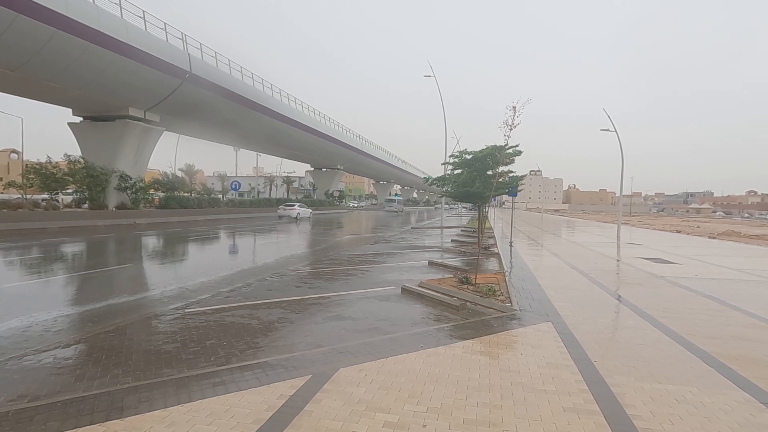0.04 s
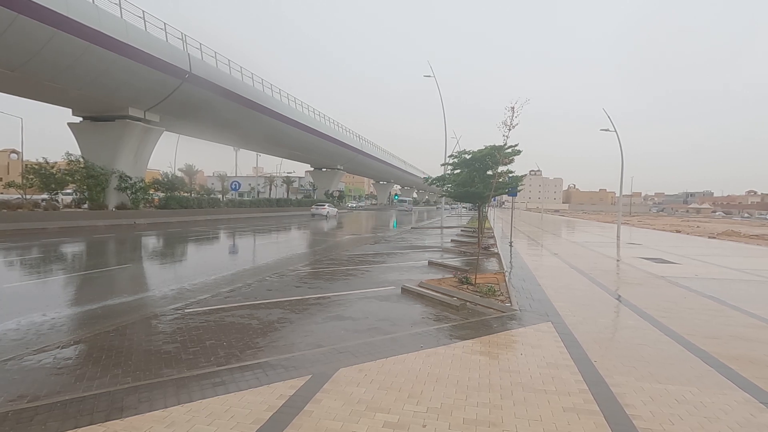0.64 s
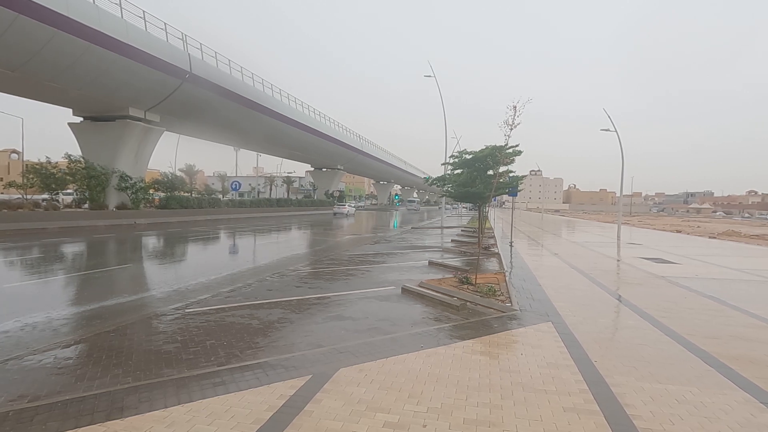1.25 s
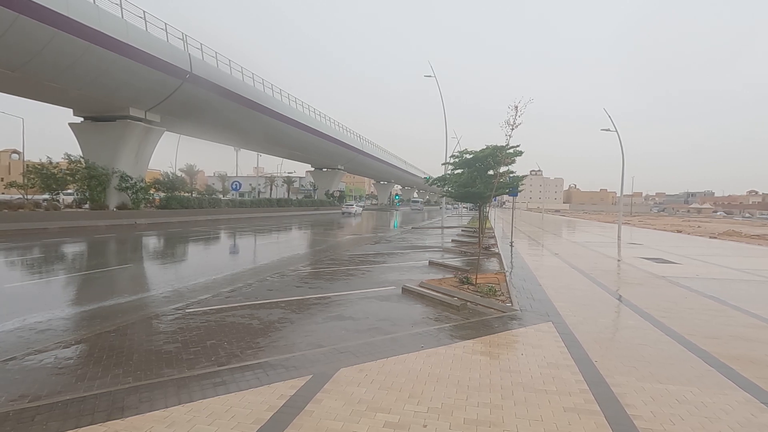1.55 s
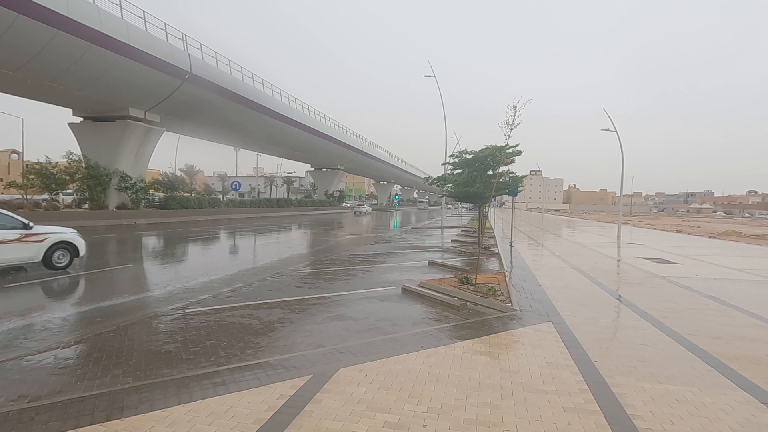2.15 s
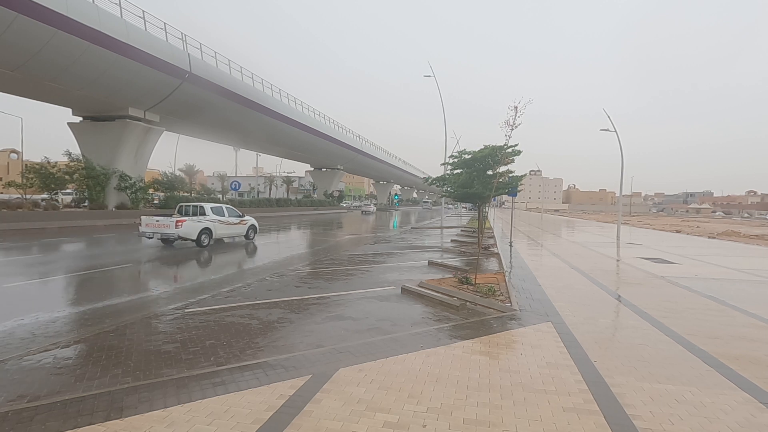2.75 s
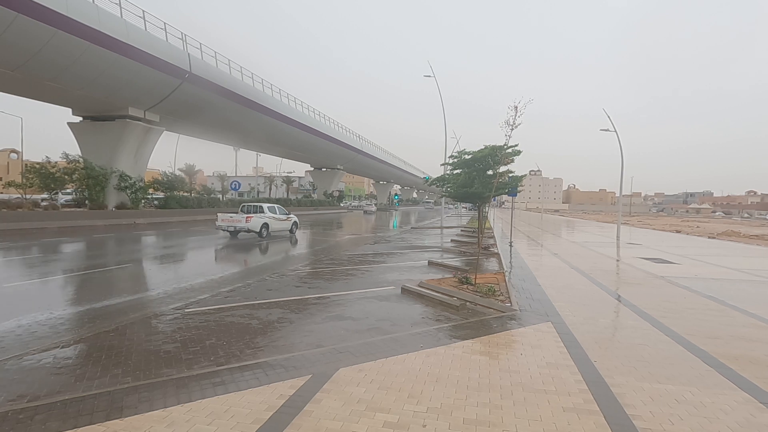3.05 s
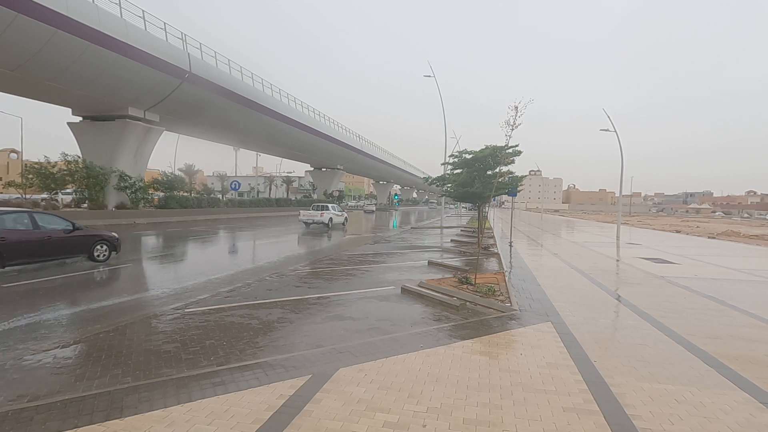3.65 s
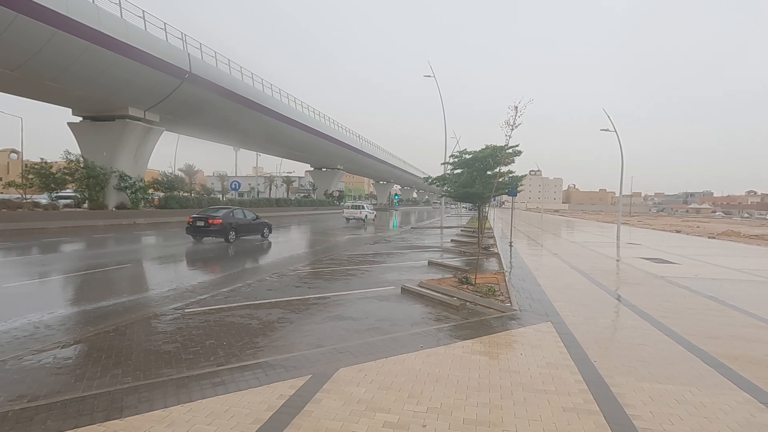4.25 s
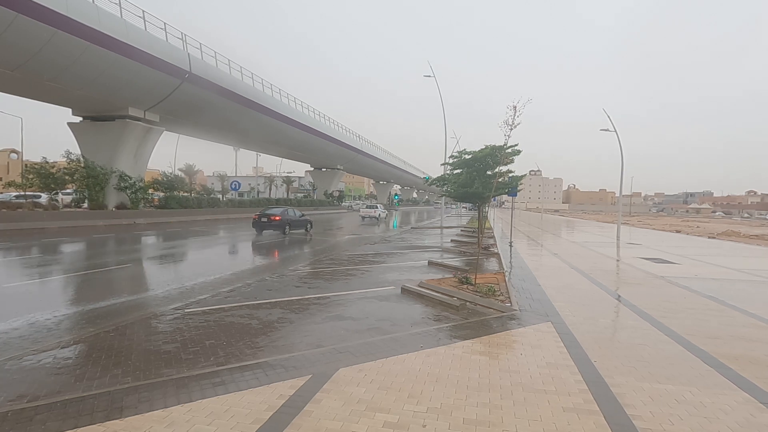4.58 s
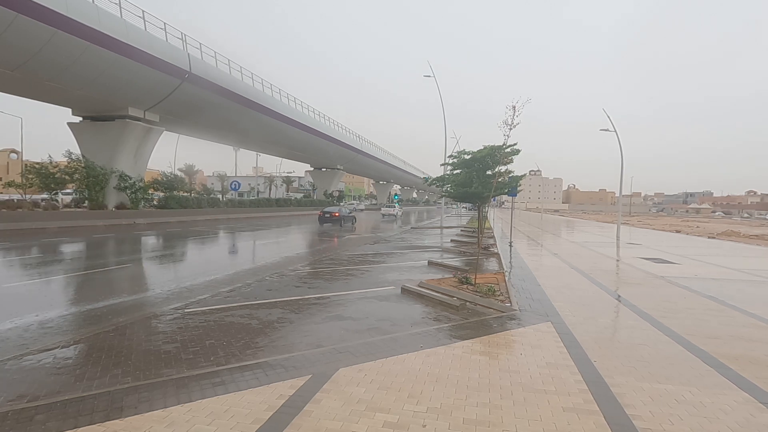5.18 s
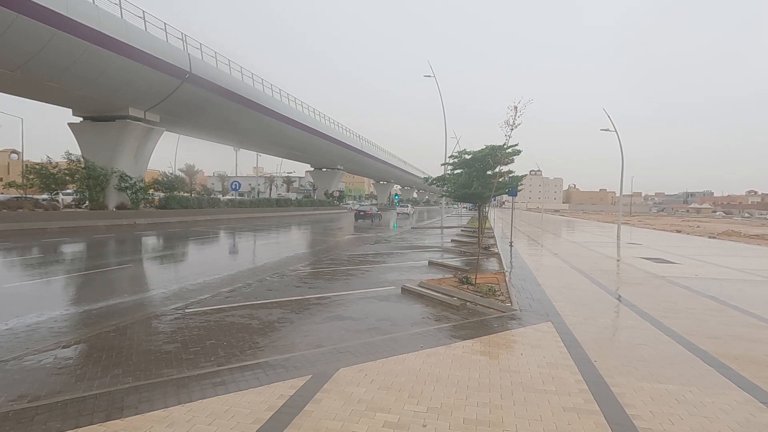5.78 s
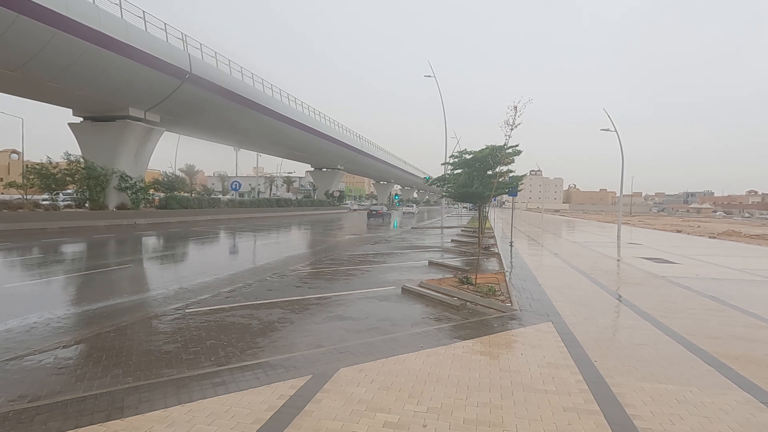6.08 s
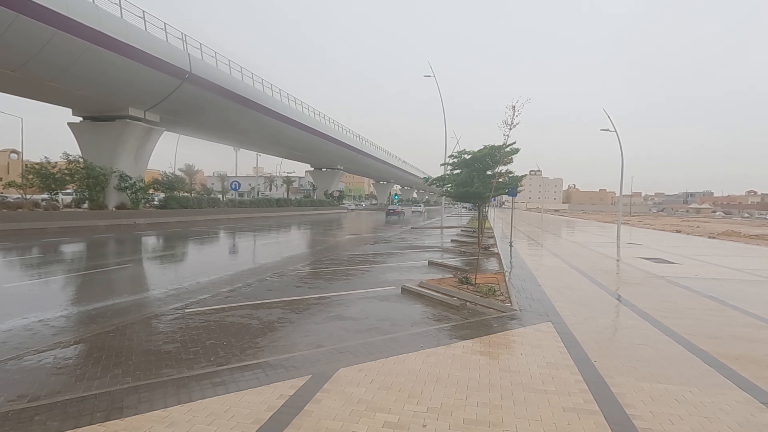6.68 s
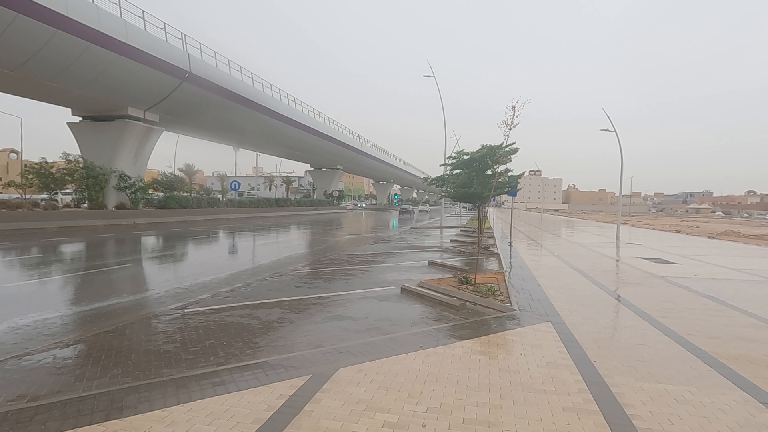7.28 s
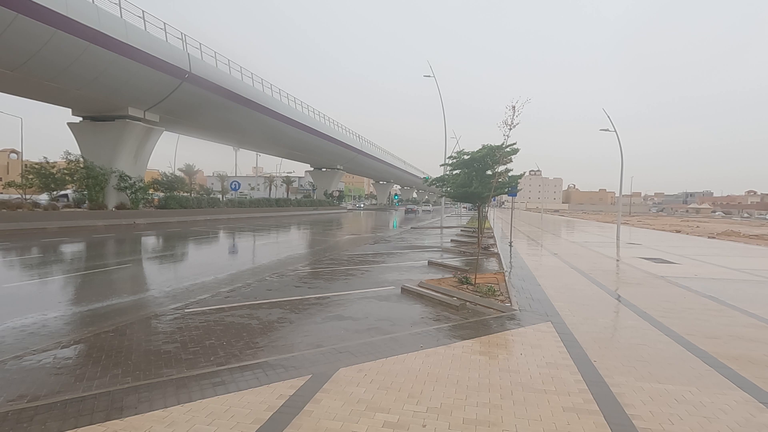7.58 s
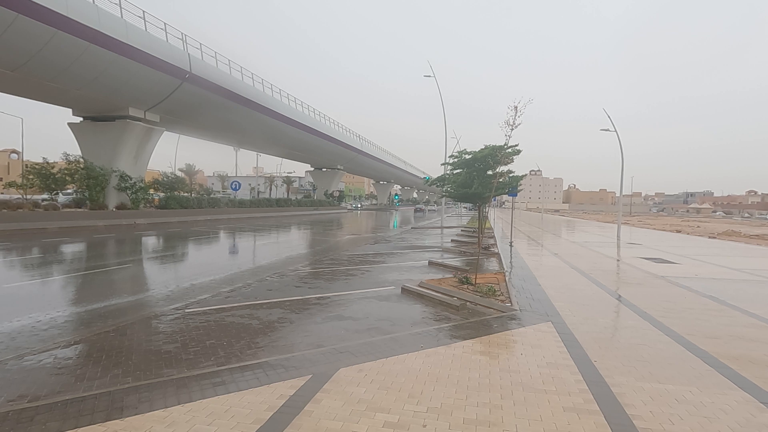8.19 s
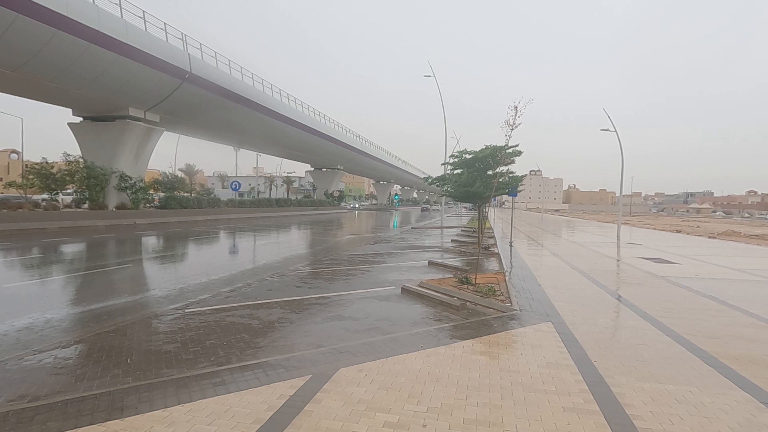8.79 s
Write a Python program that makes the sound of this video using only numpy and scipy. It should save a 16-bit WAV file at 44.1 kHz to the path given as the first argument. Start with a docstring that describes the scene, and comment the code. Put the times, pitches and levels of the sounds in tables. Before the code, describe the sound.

Steady rain patters on a wide wet road and paving, with low traffic rumble and light gusts of wind, all heard through a muffled microphone. Tyre hiss from a passing vehicle is already there at the start. A pickup passes from about 1.5 to 3 seconds with a low exhaust hum, its tyres roaring, hissing and swishing through water. A car follows at about 3.5 to 4.5 seconds, throwing spray, and a softer pass comes near 6 seconds. At 5.5 seconds a raindrop strikes by the microphone with a short ringing tick. From about 6 seconds a heavier engine drones, strongest near 7, then climbs in pitch to the end as the hiss eases. Another vehicle and the rumble swell around 8.5 seconds. Dull thumps fall at the very start and near 2.5, 4.1, 5.1, 7.2 and 8.7 seconds.

```python
"""Tyres roar and hiss on a wide wet road in steady rain, heard through a muffled microphone.
A pickup and a saloon pass among other traffic, swelling by the inverse square law and throwing spray;
then a heavier engine pulls up through its revs, its exhaust harmonics rising with the firing rate.
Raindrops patter and set bubbles ringing, and one strikes by the microphone and rings its casing.
Dull thumps, traffic rumble and light wind fill the bass."""
import sys
import numpy as np
from scipy import signal
from scipy.fft import rfft, irfft, next_fast_len
from scipy.io import wavfile

SR = 44100
rng = np.random.default_rng(int(sys.argv[2]) if len(sys.argv) > 2 else 0)


def transcribe(u):
    """Save the signal u as a 16-bit wav file named by the first command-line argument.

    u: samples, shape (n,) or (channels, n), limited to [-1, 1]; the rate is SR.
    q: integer samples, one column per channel.
    """
    v = np.clip(np.atleast_2d(u).T, -1, 1)
    q = np.round(v * 32767).astype(np.int16)
    wavfile.write(sys.argv[1], SR, q)


N = 393813
TIME = np.arange(N) / SR


# spectra of tread hiss, hollow body noise and spray: frequency_hz, density_db
TREAD_SPECTRUM = [(500, -20), (900, -5), (1150, -2.5), (1400, 1), (1620, -1), (1830, -5), (2020, -7.5),
                  (2250, -11.5), (2430, -26), (2900, -19), (3500, -28.5), (4300, -46.5), (6000, -65.5)]
BODY_SPECTRUM = [(100, -12.5), (200, 3.5), (290, 1), (400, -2.5), (530, -3.5), (750, -3.5), (1300, -38)]
SPRAY_SPECTRUM = [(1500, -5), (2400, 5), (3000, 4.5), (3700, 0.5), (4400, -6), (5000, -10.5), (5600, -13),
                  (6300, -22), (7300, -29), (7900, -45.5), (9000, -61.5)]
# spray thrown up behind the wheels: peak_s, half_width_s, level_db
SPRAY_PLUMES = [(0.2, 0.35, -47.5), (0.87, 0.33, -45), (2.1, 0.37, -50.5), (2.9, 0.25, -54.5),
                (4.3, 0.54, -47.5), (5.85, 0.35, -53.5), (8.6, 0.6, -64.5)]
# passing vehicles, whose hiss and roar peak a lag after the closest approach:
# nearest_s, half_width_s, tread_lag_s, tread_db, body_db, roar_lag_s, roar_db, roar_pitch_ratio
PASS_BYS = [(-0.14, 0.83, 0.32, -30, -40.5, 0.3, -39, 0.95),
            (1.88, 0.65, 0.88, -28, -29.5, 0.13, -26, 1.007),
            (3.52, 0.65, 0.7, -28.5, -33, 0.46, -27, 1.13), (5.42, 0.4, 0.84, -33.5, -43, 0.55, -43, 1.6),
            (6.6, 0.34, 0.41, -41.5, -36, 0.03, -32.5, 0.95), (7.5, 0.18, 0.5, -50, -42, 0.03, -31.5, 1.4),
            (8.58, 0.38, 0.67, -37.5, -31.5, 0.03, -32, 0.99)]

def tyres():
    """Incoherent sources add in power: hissing grooves, hollow body noise and falling spray."""
    tread_power, body_power, spray_power = from_db([-33, -46, -62]) ** 2  # steady wash of far tyres
    for nearest_s, half_width_s, tread_lag_s, tread_db, body_db, *_ in PASS_BYS:
        tread_power += swell(nearest_s + tread_lag_s, half_width_s, tread_db)  # thrown backward
        body_power += swell(nearest_s, half_width_s, body_db)
    spray_power += sum(swell(*plume) for plume in SPRAY_PLUMES)
    tread = np.sqrt(tread_power) * turbulence(TREAD_SPECTRUM, flutter_db=0.5, flutter_hz=19)
    body = np.sqrt(body_power) * turbulence(BODY_SPECTRUM, flutter_db=0.6, flutter_hz=25)
    spray = np.sqrt(spray_power) * coloured(droplets(per_s=14000, spread_db=2.5), SPRAY_SPECTRUM)
    return tread + body + spray


# spectrum of the contact patch's roar: frequency_hz, density_db
ROAR_SPECTRUM = [(300, -18.5), (520, -3.5), (720, -0.5), (900, 1), (1100, -3), (1500, -12), (2400, -37.5)]

def rolling_roar(flutter_db):
    """Each contact patch radiates broadband noise, deepest alongside and higher with distance."""
    near_ratio, far_ratio, halfway_s = 0.92, 1.54, 1.63
    edges_hz = np.geomspace(250, 2800, num=15)
    centres_hz = np.sqrt(edges_hz[1:] * edges_hz[:-1])[:, None]
    hop = 200
    frame_s = TIME[::hop]
    hz, db = np.transpose(ROAR_SPECTRUM)

    def shares(ratio):
        """Fraction of the power in each band, with the spectrum shifted by ratio."""
        density = from_db(np.interp(np.log(centres_hz / ratio), np.log(hz), db)) ** 2
        band_power = density * np.diff(edges_hz)[:, None]
        return band_power / band_power.sum(axis=0)

    power = from_db(-43) ** 2 * shares(0.89)  # steady wash of far tyres
    for nearest_s, half_width_s, *_, lag_s, roar_db, pitch_ratio in PASS_BYS:
        away = 1 - 1 / (1 + ((frame_s - nearest_s - lag_s) / halfway_s) ** 2)
        ratio = pitch_ratio * (near_ratio + (far_ratio - near_ratio) * away)
        power = power + swell(nearest_s + lag_s, half_width_s, roar_db)[::hop] * shares(ratio)
    roar = sum(np.interp(TIME, frame_s, np.sqrt(band_power)) * band_noise(low_hz, high_hz)
               for low_hz, high_hz, band_power in zip(edges_hz, edges_hz[1:], power))
    return roar * from_db(flutter_db * drift(8))


# patches of road where the tread sings: peak_s, half_width_s, level_db, pitch_hz
SINGING_PATCHES = [(0.45, 0.09, -34, 803), (2.55, 0.13, -31.5, 1390), (3.97, 0.13, -32, 1382),
                   (4.6, 0.1, -35, 964), (5.65, 0.15, -36.5, 1420), (6.2, 0.25, -33.5, 1520)]

def groove_resonance(edge_ratio, waver_db):
    """Air resonating in the tyre grooves gives narrow, wavering bands of noise."""
    song = sum(np.sqrt(swell(peak_s, half_width_s, db)) * band_noise(hz / edge_ratio, hz * edge_ratio)
               for peak_s, half_width_s, db, hz in SINGING_PATCHES)
    return song * from_db(waver_db * drift(15))


# spectrum of a swish of water: frequency_hz, density_db
SWISH_SPECTRUM = [(1100, -3.5), (1450, 1), (2000, 7), (2450, -2), (3100, -16.5), (4000, -30)]
# sheets of water thrown aside: peak_s, half_width_s, level_db
WATER_SHEETS = [(0.15, 0.18, -38), (0.821, 0.15, -40), (1.42, 0.082, -40.5), (2.08, 0.19, -35.5),
                (3.051, 0.082, -37), (3.35, 0.13, -35.5), (3.7, 0.17, -38.5), (5.799, 0.19, -42)]

def puddle_swishes():
    """Thousands of droplet impacts superpose into a brief swish as water is thrown aside."""
    power = sum(swell(*sheet) for sheet in WATER_SHEETS)
    return np.sqrt(power) * coloured(droplets(per_s=4400, spread_db=3.5), SWISH_SPECTRUM)


# spectrum of rain on the paving: frequency_hz, density_db
RAIN_SPECTRUM = [(300, -7), (700, 0.5), (1400, 7.5), (2000, -3), (2450, -14.5), (3000, -14), (4000, -29.5),
                 (5500, -38.5), (7000, -54.5), (8000, -69), (12000, -67.5)]

def rain(ring_cycles):
    """Impacts patter on the paving; drops that hit puddles trap bubbles, which resonate briefly."""
    patter = coloured(droplets(per_s=2200, spread_db=0.5), RAIN_SPECTRUM)
    pitches_hz = np.geomspace(900, 3200, num=12)
    births = droplets(per_s=170, spread_db=3.0)
    pitch_index = rng.integers(0, len(pitches_hz), N)
    bubbles = sum(ring(births * (pitch_index == k), hz, ring_cycles / hz)
                  for k, hz in enumerate(pitches_hz))
    return from_db(-41.5) * patter + from_db(-40.5) * coloured(bubbles, RAIN_SPECTRUM)


# exhaust tones of two engines: time_s, firing_hz, fundamental_db, octave_db
PICKUP_EXHAUST = [(0, 57.06, -33.5, -39), (1.4, 57.94, -33.5, -45.5), (2.1, 58.1, -53, -42.5),
                  (2.6, 59.44, -29, -30.5), (3.1, 60.3, -35.5, -34.5), (3.5, 58.2, -42, -34.5),
                  (4.7, 56.23, -35.5, -42), (6.2, 55, -46.5, -64)]
HEAVY_EXHAUST = [(5.4, 60.1, -64.5, -67), (6.2, 60.5, -38.5, -40.5), (6.55, 61.36, -39, -29),
                 (6.85, 63.43, -19.5, -39), (7.2, 63.73, -30.5, -36.5), (7.9, 74.86, -35, -35.5),
                 (8.93, 79.9, -42, -32.5)]

def engine(exhaust, third_re_octave_db, uneven_db):
    """Periodic firing makes a harmonic series; only the lowest three orders stand out at the kerb."""
    firing_hz, fundamental_db, octave_db = in_time(exhaust)
    phase = firing_phase(firing_hz, wander=0.0085)
    levels_db = [fundamental_db, octave_db, octave_db + third_re_octave_db]
    return np.sqrt(2) * sum(from_db(db + uneven_db * drift(6.6)) * np.sin(order * phase)
                            for order, db in enumerate(levels_db, 1))


# a farther engine droning, then speeding up: time_s, firing_hz, level_db
FAR_EXHAUST = [(5.1, 88.8, -56), (5.7, 89.9, -34), (6.1, 91.1, -28.5), (6.7, 89.2, -54), (7, 66.9, -46),
               (7.3, 73.44, -33), (7.75, 87.1, -28), (8.3, 93.7, -33), (8.93, 102, -40)]

def far_engine():
    """A single exhaust tone, weakly modulated in amplitude and frequency."""
    firing_hz, db = in_time(FAR_EXHAUST)
    return from_db(db + 1.7 * drift(3.3)) * np.sin(firing_phase(firing_hz, wander=0.005))


# modes of the microphone's casing: pitch_hz, gain_db, t60_s
CASING_MODES = [(1840, -8, .06), (2320, -3, .08), (2400, -9.5, 0.086), (2600, -16, 0.061), (2830, -10, .02),
                (11300, -11, 0.005)]

def close_drop(start_s, impact_db, tick_gain_db, splash_gain_db, splash_s):
    """An impact excites the casing's damped modes, with a muffled tick and a brief splash around it."""
    impact = from_db(impact_db) * (np.arange(N) == round(start_s * SR))
    tick = from_db(tick_gain_db) * butterworth(impact, 2, [1300, 3200], "band")
    casing = sum(from_db(db) * ring(impact, hz, t60_s) for hz, db, t60_s in CASING_MODES)
    splash_envelope = from_db(impact_db + splash_gain_db) * np.exp(-np.abs(TIME - start_s) / splash_s)
    splash = splash_envelope * band_noise(2150, 2660)
    return butterworth(tick + casing + splash, 3, 4800, "low")


# dull thumps: start_s, level_db, pitch_hz, t60_cycles
LOW_KNOCKS = [(0.127, -15, 64, 5.4), (0.13, -16, 230, 3.7), (0.15, -14.5, 164, 5.9),
              (0.158, -15.5, 290, 4.6), (2.46, -11.5, 112, 5), (2.507, -12.5, 180, 7),
              (2.5119, -16.5, 280, 13), (2.525, -18, 340, 5), (4.066, -19, 70.4, 6), (4.083, -14, 150, 8),
              (4.143, -13, 63.6, 4.4), (4.1551, -15, 403, 8), (5.118, -15.5, 84.5, 12),
              (7.236, -13.5, 62.4, 7), (7.256, -12, 127, 7.3), (8.695, -14, 238, 6.9)]

def thumps(puff_gain_db, puff_rise_s):
    """Heavily damped oscillations die within a few cycles, each with a puff of noise near its pitch."""
    size = SR // 4
    age_s = np.arange(size) / SR
    puff_envelope = from_db(puff_gain_db) * age_s / puff_rise_s * np.exp(1 - age_s / puff_rise_s)
    track = np.zeros(N + size)
    for start_s, db, hz, t60_cycles in LOW_KNOCKS:
        knock = np.sin(2 * np.pi * hz * age_s) * np.exp(-np.log(1000) * age_s * hz / t60_cycles)
        puff = puff_envelope * band_noise(hz / 2, hz * 1.4, size)
        start = round(start_s * SR)
        track[start:start + size] += from_db(db) * (knock + puff)
    return butterworth(track[:N], 3, 900, "low")


# spectrum of the traffic rumble: frequency_hz, density_db
RUMBLE_SPECTRUM = [(25, -13.5), (45, -3), (62, 0.5), (90, 1), (125, -2), (160, -10.5), (230, -18),
                   (450, -36)]
# its rise and fall: time_s, level_db
RUMBLE_ENVELOPE = [(0, -31), (0.6, -28.5), (1.1, -33), (1.7, -30.5), (2.5, -32), (4.5, -28.5), (5.1, -26.5),
                   (5.6, -29.5), (7.8, -28), (8.3, -27), (8.62, -20.5), (8.93, -22.5)]

def traffic_rumble():
    """Traffic merges into low-frequency noise under a slowly varying envelope."""
    db, = in_time(RUMBLE_ENVELOPE)
    return from_db(db) * turbulence(RUMBLE_SPECTRUM, flutter_db=0.3, flutter_hz=5.8)


# spectrum of wind at the microphone: frequency_hz, density_db
WIND_SPECTRUM = [(8, -12), (20, -4.5), (33, -2), (48, 2), (75, -13), (200, -29.5)]
# short gusts: peak_s, level_db
WIND_GUSTS = [(0.061, -23.5), (2.349, -33.5), (3.449, -24), (3.999, -25.5), (4.85, -36), (6.549, -27.5),
              (7.25, -30), (8.749, -24.5)]

def wind(breeze_db, gust_half_width_s):
    """Turbulent pressure fluctuations at the microphone swell in gusts over a light breeze."""
    gust_power = sum(swell(peak_s, gust_half_width_s, db) for peak_s, db in WIND_GUSTS)
    power = from_db(breeze_db) ** 2 + gust_power
    return np.sqrt(power) * turbulence(WIND_SPECTRUM, flutter_db=-0.5, flutter_hz=5.2)


# spectrum of fine tyre mist: frequency_hz, density_db
MIST_SPECTRUM = [(6000, -0.5), (7500, 0), (9000, -4), (11200, -2.5), (12000, -9.5)]
# levels of the mist and of a thin band at its top: time_s, mist_db, top_db
MIST_ENVELOPE = [(0, -84, -99), (0.8, -82, -99), (1.5, -80.5, -93), (1.8, -86, -96), (2.25, -85, -86),
                 (2.5, -86, -90), (3.35, -90.5, -100.5), (3.9, -89.5, -87), (4.4, -87, -101),
                 (5.05, -100, -115), (7, -112, -120)]
# faint high ticks: peak_s, level_db
HIGH_TICKS = [(7.247, -81), (8.613, -81)]

def sizzle(flutter_db, tick_s, hiss_db):
    """Fine mist from the nearest tyres and two ticks superpose on a very faint, steady hiss."""
    mist_db, top_db = in_time(MIST_ENVELOPE)
    mist = from_db(mist_db) * coloured(droplets(per_s=6000, spread_db=1.5), MIST_SPECTRUM)
    mist += from_db(top_db) * band_noise(11700, 13200)
    tick_envelope = sum(from_db(db) * np.exp(-((TIME - s) / tick_s) ** 2) for s, db in HIGH_TICKS)
    ticks = tick_envelope * band_noise(6500, 14000)
    return mist * from_db(flutter_db * drift(9)) + ticks + from_db(hiss_db) * rng.standard_normal(N)


def swell(peak_s, half_width_s, db):
    """Inverse square law for a source going straight past: power halves at half_width_s from the peak."""
    return from_db(db) ** 2 / (1 + ((TIME - peak_s) / half_width_s) ** 2)


def firing_phase(hz, wander):
    """Phase is the integral of frequency, here of an engine whose speed is never quite even."""
    return 2 * np.pi * np.cumsum(hz * (1 + wander * drift(5.34))) / SR


def droplets(per_s, spread_db):
    """A Poisson train of impacts, many small and a few large."""
    sizes = from_db(spread_db * np.minimum(rng.exponential(1, N), 5))
    signs = rng.choice([-1, 1], N)
    return sizes * signs * (rng.random(N) < per_s / SR)


def ring(clicks, hz, t60_s):
    """A damped resonator: a unit impulse starts a decaying sine of height 1."""
    radius, angle = np.exp(-np.log(1000) / (t60_s * SR)), 2 * np.pi * hz / SR
    return signal.lfilter([0, np.sin(angle)], [1, -2 * radius * np.cos(angle), radius ** 2], clicks + 1e-18)


def turbulence(spectrum, flutter_db, flutter_hz):
    """Coloured noise under random amplitude modulation; rms 1."""
    noise = coloured(rng.standard_normal(N), spectrum)
    return unit_rms(noise * from_db(flutter_db * drift(flutter_hz)))


def coloured(x, spectrum):
    """Spectral shaping that falls 40 dB an octave past the table's ends; rms 1."""
    size = next_fast_len(N)
    hz, db = np.transpose(spectrum)
    octave = np.log2(np.maximum(np.fft.rfftfreq(size, 1 / SR), 1))
    outside = np.abs(octave - np.clip(octave, np.log2(hz[0]), np.log2(hz[-1])))
    gain = from_db(np.interp(octave, np.log2(hz), db) - 40 * outside)
    return unit_rms(irfft(rfft(x, size) * gain, size)[:N])


def drift(rate_hz):
    """Slow random variation: noise low-passed at rate_hz; rms 1."""
    hop, settle = 40, 2000
    pole = np.exp(-2 * np.pi * rate_hz * hop / SR)
    noise = rng.standard_normal(N // hop + settle + 2)
    slow = signal.lfilter([1], [1, -2 * pole, pole ** 2], noise)[settle:]
    return np.interp(np.arange(N) / hop, np.arange(len(slow)), unit_rms(slow))


def band_noise(low_hz, high_hz, size=N):
    """Band-limited noise; rms 1."""
    return unit_rms(butterworth(rng.standard_normal(size), 3, [low_hz, high_hz], "band"))


def butterworth(x, order, cutoff_hz, kind):
    """A filter with a maximally flat passband."""
    return signal.sosfilt(signal.butter(order, cutoff_hz, kind, fs=SR, output="sos"), x)


def in_time(rows):
    """Linear interpolation of each column after time_s to every sample."""
    time_s, *columns = np.transpose(rows)
    return [np.interp(TIME, time_s, column) for column in columns]


def from_db(db):
    """Decibels to amplitude ratio."""
    return 10 ** (np.asarray(db) / 20)


def unit_rms(x):
    """Normalisation to unit power."""
    return x / np.sqrt(np.mean(x ** 2) + 1e-20)


def scene():
    """Superposition: the pressures of road, water, engines and wind add at one microphone."""
    engines = engine(PICKUP_EXHAUST, third_re_octave_db=-12.5, uneven_db=3.5)
    engines += engine(HEAVY_EXHAUST, third_re_octave_db=-10.0, uneven_db=2.5) + far_engine()
    drop = close_drop(start_s=5.483, impact_db=-21.5, tick_gain_db=4.5,
                      splash_gain_db=-5.5, splash_s=0.012)
    water = puddle_swishes() + rain(ring_cycles=14) + drop
    treble = sizzle(flutter_db=1.5, tick_s=0.011, hiss_db=-99)
    road = rolling_roar(flutter_db=0.9) + tyres() + groove_resonance(edge_ratio=1.09, waver_db=2.0)
    bass = traffic_rumble() + wind(breeze_db=-30, gust_half_width_s=0.072)
    bass += thumps(puff_gain_db=-18.5, puff_rise_s=0.016)
    return (road + water + engines + bass + treble)[None]


def record(dry):
    """A steep low-pass filter removes the highest treble."""
    stopband_hz, attenuation_db = 14200, 70
    return signal.sosfilt(signal.cheby2(12, attenuation_db, stopband_hz, fs=SR, output="sos"), dry)


dry = scene()
out = record(dry)
transcribe(out)
```